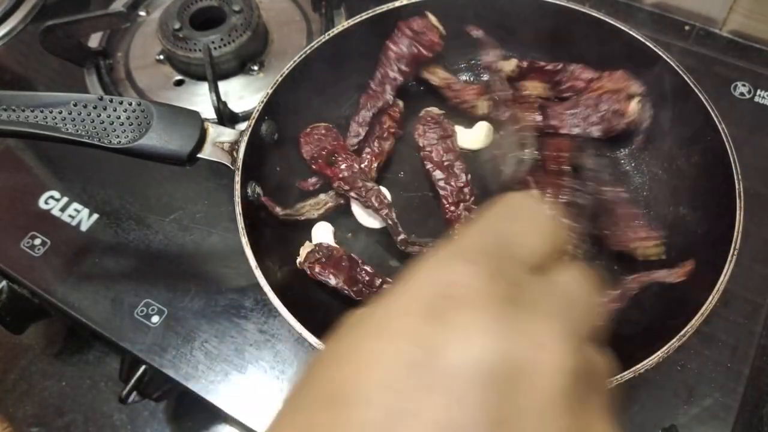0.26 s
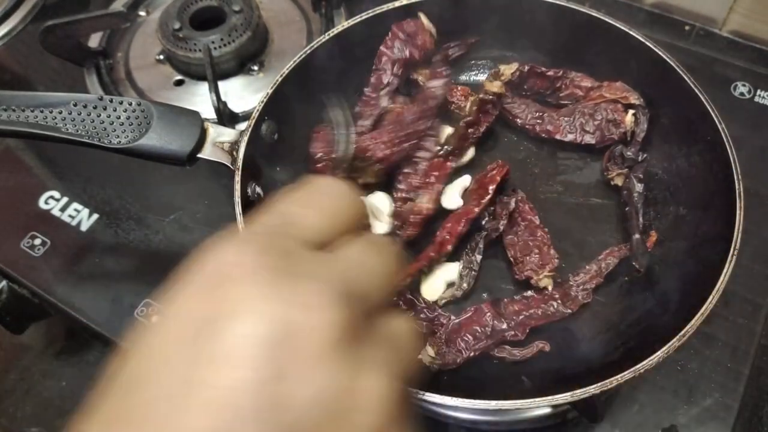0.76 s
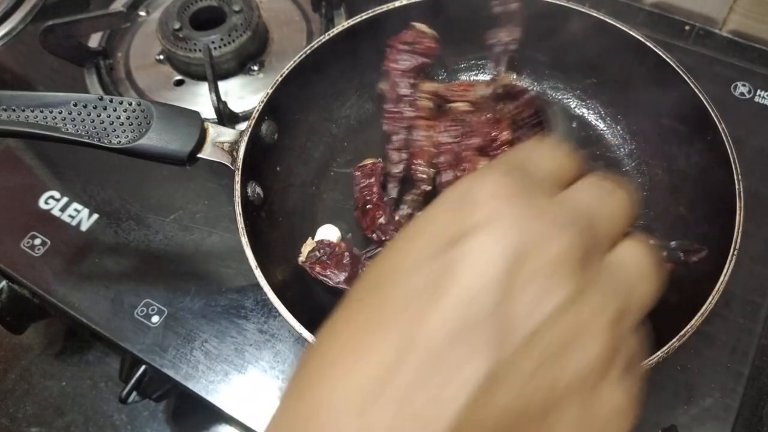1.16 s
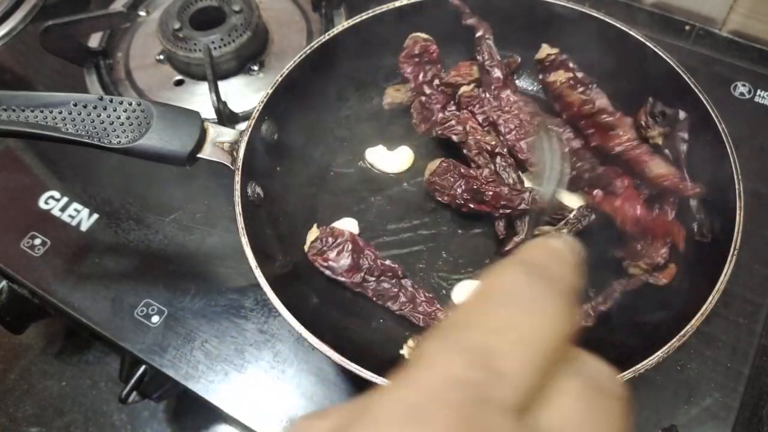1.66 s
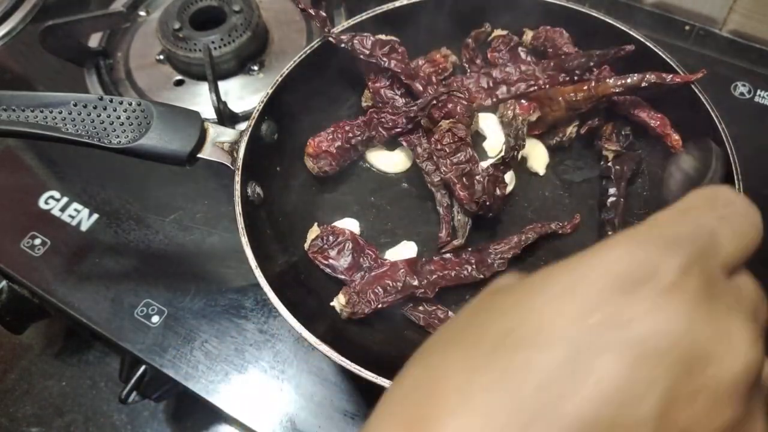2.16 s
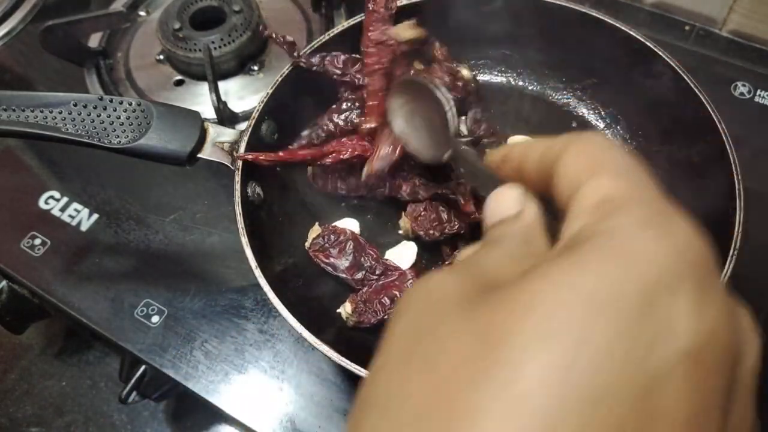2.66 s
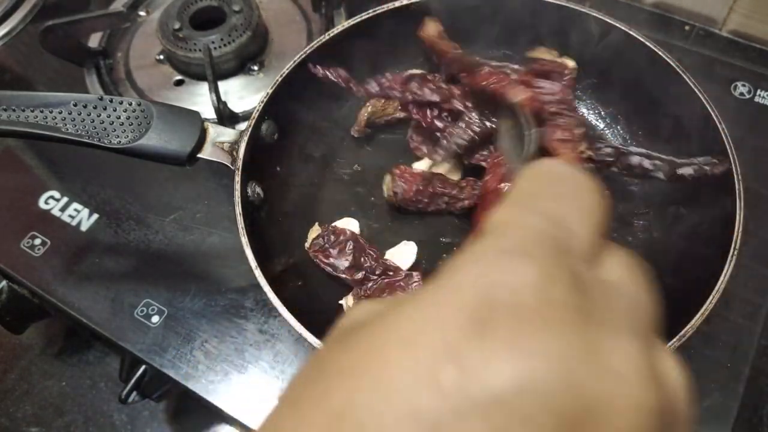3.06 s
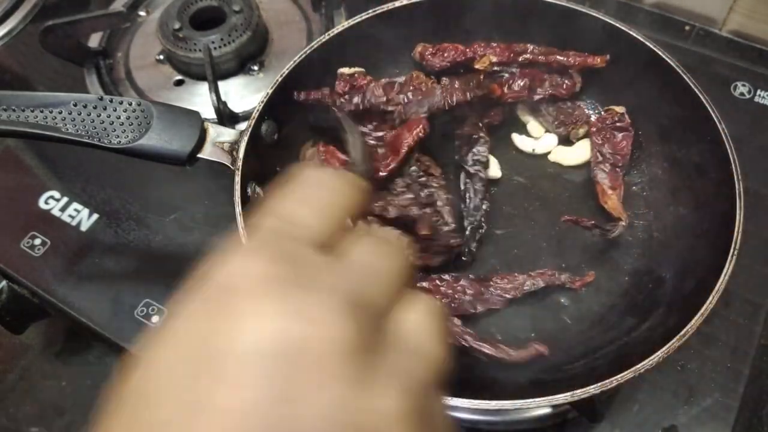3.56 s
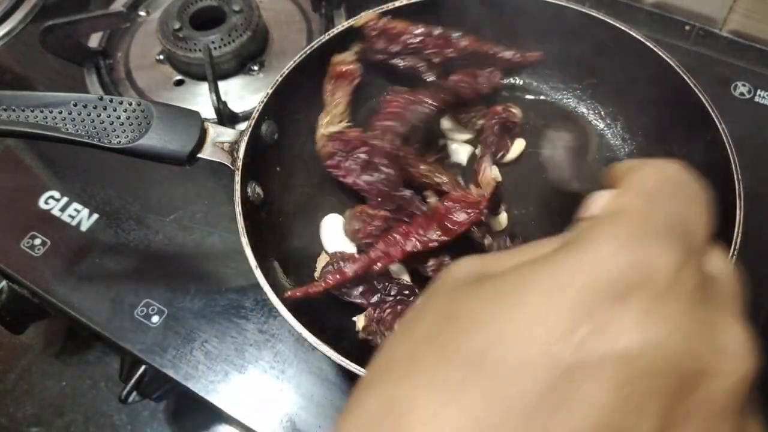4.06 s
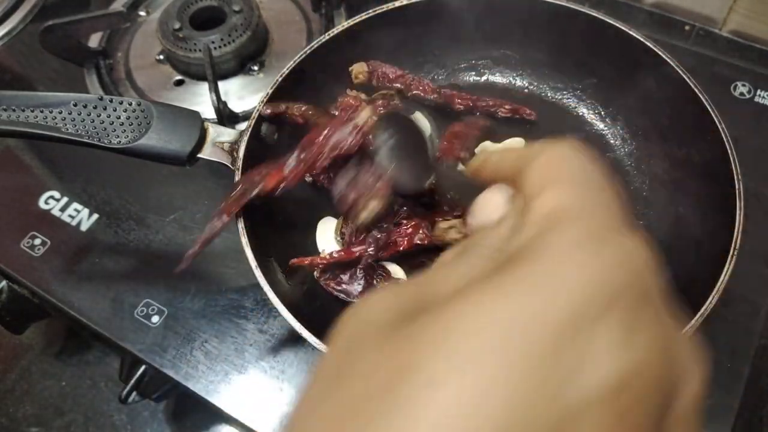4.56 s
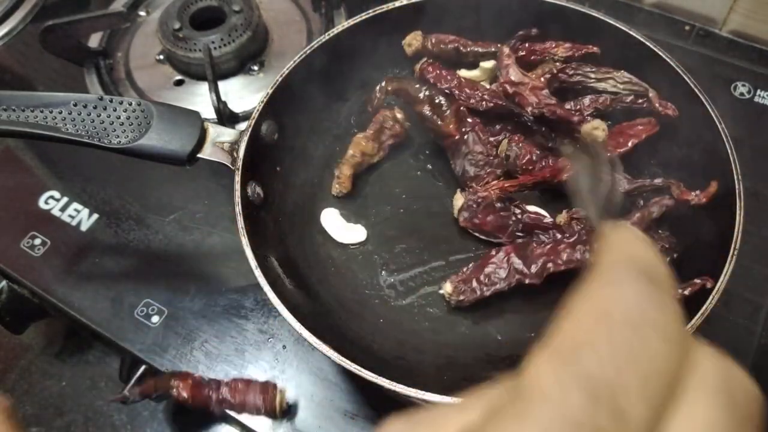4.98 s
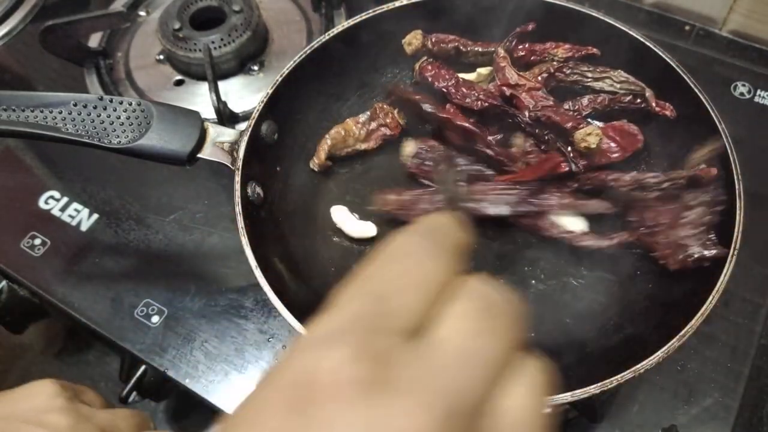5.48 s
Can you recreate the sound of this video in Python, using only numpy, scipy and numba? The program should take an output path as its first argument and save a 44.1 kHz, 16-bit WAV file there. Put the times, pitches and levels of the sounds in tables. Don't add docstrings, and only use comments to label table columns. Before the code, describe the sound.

Heard from just above the pan, stirring begins mid-action with a dense clatter of nuts and crackling pods. Spoon taps give short, food-muffled pan notes, and dragging makes gritty scrapes. A hard knock comes just after one second; later strokes are spaced, with a near pause midway and firmer knocks near four seconds. Fine seed patter trails off over quiet burner hiss and room hum in a small hard-walled kitchen.

```python
import sys
import numpy as np
from scipy import signal
from scipy.fft import rfft, irfft, next_fast_len
from scipy.io import wavfile
from scipy.ndimage import uniform_filter1d
from numba import njit

SR = 44100
rng = np.random.default_rng(int(sys.argv[2]) if len(sys.argv) > 2 else 0)


def store_wav(level_fs):
    pcm = np.round(np.clip(np.atleast_2d(level_fs), -1, 1) * 32767)
    wavfile.write(sys.argv[1], SR, pcm.T.astype(np.int16))


def amplitude_ratio(level_db):
    exponent = np.asarray(level_db, float) / 20
    return 10 ** exponent


N = 252260

# (time [s], bell peak [dB], rim re bell [dB], base re bell [dB])
TAPS = [(0.219, -37, -13, -18.5), (0.2572, -37, 1.5, -4), (0.371, -25, 9, -33), (0.405, -33, 3.5, -32.5),
        (0.435, -24, 2.5, -50), (0.68, -33, -13.5, -44), (0.7877, -30, 7, -47), (0.1514, -36.5, 2, -24),
        (0.9406, -44, -31, -56), (1.1561, -23, -23, 0.5), (1.224, -51, -25, -24), (1.267, -35.5, -6, -8),
        (1.3978, -32, -12, -48), (1.4468, -36, -27, -38), (1.7866, -38, -3.5, -33), (2.188, -36.5, 7, 4.5),
        (2.221, -44.5, -6, 14), (2.341, -33, -8, -34), (3.049, -32, -4.5, -50), (3.3256, -31.5, -29, -32),
        (3.4056, -32.5, -1, -49), (3.6036, -35.5, -2, -22), (3.921, -27.5, -24, -16.5),
        (3.984, -45, -19, -17), (4.125, -35, -6, -41), (4.2509, -25, -13.5, -6.5), (4.399, -28.5, 1.5, -14),
        (4.4902, -35, 12, -28), (4.6337, -36, 3, -40), (4.948, -33.5, -30, -8), (0.4977, -44, 3, -33),
        (0.548, -38.5, -9, -33), (0.618, -46, -7, -28), (0.764, -39.5, 2.5, -33), (0.831, -32, -7, -22),
        (0.897, -40, 11, -38.5), (1.2804, -32, 1.5, -33), (1.635, -46, 3, -40), (2.2516, -44, -16, 1),
        (2.288, -32, -16, -25), (2.996, -48, -6, -29), (3.3776, -38.5, -13, -35), (3.696, -38.5, 6, -33),
        (4.0552, -36, 0, -34), (4.343, -41, 8, 2), (4.375, -39, 10, -2.5), (4.8488, -37.5, -10, -36),
        (5.125, -49.5, 14, -38), (5.434, -38, -21, -35), (0.562, -28, 7, -35)]
# (time [s], peak [dB], skin pitch [Hz], hollow body re crack [dB])
TICKS = [(0.046, -17, 8050, -16), (0.16, -36, 7540, 5), (0.2403, -20.5, 7540, -26),
         (0.299, -15, 7990, -0.5), (0.3832, -18.5, 7990, 0.5), (0.464, -22, 7990, -16),
         (0.6521, -18, 6940, -9), (0.7658, -20.5, 7050, -2), (1.1565, -17, 5850, 0.5),
         (1.2592, -33, 7420, 2), (1.4132, -36, 7600, -13), (1.475, -20.5, 7600, -1),
         (1.7587, -27, 8260, -36), (1.803, -26.5, 7990, -23), (2.1821, -17.5, 4450, -2),
         (2.2657, -21, 8350, -22), (2.342, -23, 8800, -19), (2.577, -29.5, 8850, -33.5),
         (3.3125, -28, 5870, -2), (3.3844, -23.5, 7180, -8.5), (3.4927, -22, 7400, -12.5),
         (3.596, -31, 7300, -2), (3.919, -22, 7930, -9), (4.2517, -21, 8700, -28), (4.351, -24, 7560, -23),
         (4.898, -21, 8300, -20), (5.125, -25.5, 7000, -10), (5.217, -24.5, 8060, -11.5),
         (5.271, -33, 7400, -29), (5.4239, -20, 7250, -21), (0.1747, -24, 8300, -20),
         (1.3975, -33, 7190, -15), (2.035, -29, 8230, -6), (2.1283, -31, 9330, -28.5),
         (2.617, -33, 8630, -21), (2.9372, -52, 7600, -8), (3.009, -33, 8400, -29),
         (3.5498, -30, 9700, -21), (3.6102, -22, 7620, -15), (3.675, -43, 7400, -19),
         (3.9777, -25.5, 7400, -12), (4.3266, -29, 7500, -12), (4.375, -30, 9500, 1),
         (4.6478, -35.5, 7300, -14), (4.7306, -34, 7200, -7), (4.931, -21, 8560, -28),
         (5.3327, -32, 7220, -26), (5.445, -46, 7240, -21), (5.5583, -36, 7640, -14),
         (0.8355, -27, 7200, 5)]
# (frequency [Hz], density [dB per Hz])
POD = [(400, -24), (700, 0), (1300, 1), (2300, 6.5), (3300, 2.5), (4500, -4.5), (6000, -60)]
# (frequency [Hz], density [dB per Hz])
AIR = [(8500, -20.5), (10300, 1.5), (12500, 1.5), (14500, -3.5), (15300, -9.5), (16200, -29)]
LEFT_LAG = dict(base=.7, bell=.6, rim=1.5, spoon=1.5)
LOADED_T60_S = 0.098
SNAP_T60_S = 0.003


def colour(x, points):
    size = next_fast_len(N + 4096)
    hz, db = np.transpose(points)
    bins_hz = np.arange(size // 2 + 1) * SR / size
    gain = amplitude_ratio(np.interp(np.log(bins_hz + 1), np.log(hz), db))
    gain = gain / np.sqrt(np.mean(gain ** 2))
    return irfft(rfft(x, size) * gain, size)[..., :N]


def band(x, lo_hz, hi_hz):
    return signal.sosfilt(signal.butter(2, [lo_hz, hi_hz], "band", fs=SR, output="sos"), x)


def smear(x, t60_s):
    decay = 1000. ** (-np.arange(16384) / SR / max(t60_s, .001))
    tail = rng.standard_normal((2, 16384)) * decay
    tail = tail / np.sqrt(np.sum(tail ** 2, 1, keepdims=True))
    return signal.fftconvolve(np.atleast_2d(x), tail, axes=1)[:, :N]


def sides(pan_db):
    return amplitude_ratio(np.array([pan_db, -pan_db]).reshape(2, -1) / 2)


def grit(rate, spread_db):
    on = rng.random(N) < rate / SR
    size = amplitude_ratio(spread_db * np.minimum(rng.exponential(size=N), 4))
    x = on * rng.choice([-1., 1.], N) * size
    return x / np.sqrt(np.mean(x ** 2))


def walk(rate):
    hold = int(SR / rate)
    steps = np.repeat(rng.standard_normal(1024)[:N // hold + 1], hold)[:N]
    return 1.6 * uniform_filter1d(steps, hold)


def strokes(rows):
    swell_db_per_s, fade_db, fade_bend = 55, 35.5, 1.3
    bite_s, lead_s = .014, .006
    columns = np.transpose(rows)[:, :, None]
    (s, swell, fade, db), trait = columns[:4], columns[-1]
    t = np.arange(0, N, 32) / SR
    late = t - s - swell
    rise = swell_db_per_s * np.minimum(late, 0)
    fall = fade_db * (np.maximum(late, 0) / abs(fade)) ** fade_bend
    bite = np.clip((t - s + lead_s) / bite_s, 0, 1)
    power = (amplitude_ratio(db + rise - fall) * bite) ** 2 + 1e-12
    total = power.sum(0)
    curves = 10 * np.log10(total), (power * trait).sum(0) / total
    return [np.interp(np.arange(N) / SR, t, curve) for curve in curves]


@njit
def resonate(force, drift, soft, fade, spin):
    out, push, z = np.empty(len(force), np.complex128), 0j, 0j
    for i in range(len(force)):
        push = soft * spin * push + (1 - soft) * force[i]
        z = fade * spin * complex(1 - drift[i] ** 2 / 2, drift[i]) * z + push
        out[i] = z
    return out


def ring(modes, s, hit, drag, lag, most_s, push_s=0.0033, detune=.012):
    uneven_db = 2.5
    turns = np.zeros(N, complex)
    soft = np.exp(-1 / (push_s * SR))
    for hz, db, t60 in modes:
        fade = np.exp(-np.log(1000) / (min(t60, most_s) * SR))
        strength, phase = rng.standard_normal((2, len(s)))
        force = drag * np.sqrt(2 - 2 * fade ** 2) + 1e-18j
        force[(s * SR).astype(int)] += hit * amplitude_ratio(uneven_db * strength) * np.exp(.5j * phase)
        drift = 2 * np.pi * detune * hz / SR * walk(30)
        turns += amplitude_ratio(db) * resonate(force, drift, soft, fade, np.exp(2j * np.pi * hz / SR))
    left_right = np.array([[-1], [1]])
    out = np.cos(lag / 2) * turns.imag + np.sin(lag / 2) * turns.real * left_right
    return band(out, 0.54 * modes[0][0], 1.5 * modes[-1][0])


def kitchen(alike=.88):
    # (frequency [Hz], density [dB per Hz])
    air_points = [(20, -33), (60, 7.5), (150, 7.5), (400, 11), (700, 1), (1050, 9), (2000, -6.5),
                  (5000, -7), (8000, -13), (10500, -30.5), (16000, -55.5)]
    # (time [s], pitch [Hz], level [dB], half length [s])
    nudges = [(1.99, 99, -65, .045), (1.98, 70, -72, .04), (2.0, 130, -73, .04), (.22, 300, -62, .025),
              (1.85, 150, -72, .03), (2.23, 150, -70, .03), (1.3, 200, -72, .05), (.88, 100, -76, .04),
              (1.53, 400, -69, .03), (2.77, 340, -73, .03), (3.228, 330, -71, .02), (3.63, 330, -67, .025),
              (5.245, 330, -70, .02), (5.295, 330, -70, .02)]
    t = np.arange(N) / SR
    shared, left, right = rng.standard_normal((3, N))
    noise = np.sqrt(alike) * shared + np.sqrt(1 - alike) * np.array([left, right])
    out = amplitude_ratio(-82.5) * colour(noise, air_points)
    for s, hz, db, half_s in nudges:
        out = out + amplitude_ratio(db) * np.exp(-((t - s) / half_s) ** 2) * np.sin(2 * np.pi * hz * t)
    return out


def burner():
    # (centre [Hz], width [Hz], level [dB])
    hiss_bands = [(113.4, 44, -87), (7400, 160, -87.5), (8700, 110, -64.5), (9500, 110, -74.5),
                  (9490, 200, -62), (9510, 130, -67.5)]
    out = 0
    for hz, width_hz, db in hiss_bands:
        mics = 2 if hz > 500 else 1
        jet = band(rng.standard_normal((mics, N)), hz - width_hz / 2, hz + width_hz / 2)
        out = out + amplitude_ratio(db) * jet / np.std(jet)
    return out


def rubs(rate, spread_db, tail_s):
    keep = np.exp(-1 / (tail_s * SR))
    return np.sqrt(signal.lfilter([1 - keep], [1, -keep], grit(rate, spread_db) ** 2))


def patchy(x, patchy_db, size=(5, 9)):
    z = signal.stft(x, nperseg=512)[2]
    field = uniform_filter1d(rng.standard_normal(z.shape[1:]), size=size[0], axis=0)
    field = uniform_filter1d(field, size=size[1], axis=1)
    gain = amplitude_ratio(patchy_db * field / field.std())
    gain = gain / np.sqrt(np.mean(gain ** 2))
    return signal.istft(z * gain, nperseg=512)[1][:, :N]


def rustle(skin_db, body_db, air_db):
    # (frequency [Hz], density [dB per Hz])
    skin_points = [(2500, -37.5), (3500, -8), (4500, -8), (6300, -9.5), (7300, -1), (8400, -5.5),
                   (9100, -7.5), (9700, -10), (10500, -13.5), (12000, -51)]
    crackle = rubs(2200, 2.6, 0.003) * amplitude_ratio(skin_db + 1.78 * walk(25))
    hollow = rubs(770, 5.0, 0.017) * amplitude_ratio(skin_db)
    noise = rng.standard_normal((3, 2, N))
    skin = colour(crackle * noise[0], skin_points)
    body = colour(np.sqrt(crackle * hollow) * amplitude_ratio(body_db) * noise[1], POD)
    air = colour(crackle * amplitude_ratio(air_db) * noise[2], AIR)
    mix = amplitude_ratio(3.5) * skin * sides(-0.38) + amplitude_ratio(2.5) * body * sides(2.4) + amplitude_ratio(2.0) * air * sides(7.1)
    return patchy(mix, patchy_db=2.5)


def snaps(rustle_db):
    # (time [s], peak [dB])
    breaks = [(0.6514, -32), (1.414, -30), (1.4748, -22), (1.159, -39), (1.7613, -39), (1.8028, -37),
              (2.3486, -37), (1.717, -40), (1.7401, -41), (1.8262, -40), (1.859, -43), (2.185, -33),
              (2.226, -34), (2.243, -32), (2.2672, -29), (2.305, -38), (2.3424, -31), (2.3997, -43),
              (2.451, -42), (2.4968, -43), (0.2592, -25), (0.965, -32), (3.311, -39.5), (3.682, -36),
              (4.409, -36), (4.4278, -43), (4.797, -53), (5.219, -30), (5.433, -41), (2.684, -50.5),
              (3.492, -25), (4.0434, -35), (4.1774, -52), (4.2507, -29), (4.8968, -24.5), (5.042, -40.5),
              (5.2699, -43)]
    # (frequency [Hz], density [dB per Hz])
    click_points = [(800, -29), (3000, -12), (7000, -1), (11000, -7), (16500, -10)]
    clicks = grit(250, 2.7) * amplitude_ratio(rustle_db - 14)
    s, db = np.transpose(breaks)
    clicks[(s * SR).astype(int)] += amplitude_ratio(db + 11)
    return colour(smear(clicks, SNAP_T60_S), click_points) * sides(4.9)


def pan(bell_db, rim_db, base_db, rustle_db):
    # (frequency [Hz], level [dB], t60 [s])
    bell_modes = [(965, -20, 0.09), (993.4, -15.5, 0.1), (1020, -21, 0.065), (1053, -12, 0.1),
                  (1065, -3, 0.1)]
    rim_modes = [(1830, -11, 0.045), (1858, -8, 0.055), (2018, -23, 0.06), (2190, -26, 0.06),
                 (2520, -30, 0.05)]
    base_modes = [(285, -11, 0.027), (329, -7.5, 0.2), (363, -9.5, 0.08), (431, -16, 0.079),
                  (508, -14.5, 0.12), (668.4, -4, 0.052)]
    spoon_modes = [(5940, -15, 0.1), (6700, -3.5, 0.065), (7480, -8, 0.08), (7990, -3, 0.12),
                   (8880, -3, 0.1), (9400, -11, 0.1)]
    s, db, tap_rim_db, tap_base_db = np.transpose(TAPS)
    slip = grit(900, 3.64) * amplitude_ratio(bell_db)
    bell = ring(bell_modes, s, amplitude_ratio(db - 2.0), slip * amplitude_ratio(-1.5), LEFT_LAG["bell"], LOADED_T60_S)
    rim = ring(rim_modes, s, amplitude_ratio(db + tap_rim_db + 0.5), slip * amplitude_ratio(rim_db + 5.5),
               LEFT_LAG["rim"], LOADED_T60_S, push_s=0.0016, detune=0.01202)
    base = ring(base_modes, s, amplitude_ratio(db + tap_base_db - 11.0), slip * amplitude_ratio(base_db + 5.0),
                LEFT_LAG["base"], 2 * LOADED_T60_S)
    tick_s, tick_db = np.transpose(TICKS)[:2]
    rub = grit(420, 9.5) * amplitude_ratio(rustle_db - 9.0)
    spoon = ring(spoon_modes, tick_s, amplitude_ratio(tick_db - 22.0), rub, LEFT_LAG["spoon"], LOADED_T60_S,
                 push_s=0.00049)
    return bell * sides(-2.0) + rim * sides(4.1) + base * sides(2.5) + spoon


def seeds():
    # (start [s], swell [s], fade [s], level [dB])
    trickles = [
        (1.626, 0.16, 0.48, -52),
        (2.2, 0.11, 0.26, -51.5),
        (2.4, 0.061, 0.32, -53.5),
        (2, 0.034, 0.2, -56),
        (0.032, 0.07, 0.13, -48.5),
        (0.25, 0.13, 0.17, -45),
        (3.5, 0.055, .25, -62),
        (3.93, 0.074, .3, -59.5),
        (4.3, 0.045, 0.2, -53.5),
    ]
    patter = np.array([grit(3000, 2.5), grit(3000, 2.5)])
    return colour(smear(patter * amplitude_ratio(strokes(trickles)[0]), SNAP_T60_S), AIR) * sides(8.5)


def ticks(crack_s=.0028, skin_s=.004, body_s=.006, rise_s=.0006):
    # (frequency [Hz], density [dB per Hz])
    crack_points = [(1500, -40), (2500, -22), (4500, -8), (7300, 8), (9500, -2), (13000, -6), (15500, -20),
                    (16500, -55)]
    crack, body, skin = np.zeros((3, 2, N + 2048))
    t = np.arange(2048) / SR
    for s, db, hz, body_db in TICKS:
        noise = rng.standard_normal((2, 2, 2048))
        at = slice(int(s * SR), int(s * SR) + 2048)
        gain = amplitude_ratio(db) * (1 - np.exp(-t / rise_s))
        crack[:, at] += gain * noise[0] * np.exp(-t / crack_s)
        body[:, at] += gain * amplitude_ratio(body_db) * noise[1] * np.exp(-t / body_s)
        phase = 3 * noise[0, :, :1]
        skin[:, at] += gain * np.sin(2 * np.pi * hz * t + phase) * np.exp(-t / skin_s)
    cracks = amplitude_ratio(-16.5) * colour(crack[:, :N], crack_points) * sides(6)
    bodies = amplitude_ratio(-14.5) * colour(body[:, :N], POD)
    return cracks + bodies + amplitude_ratio(-8) * skin[:, :N]


def dish():
    # (frequency [Hz], level [dB], t60 [s])
    floor_modes = [(680, -18, .07), (870, -18.5, 0.031), (941, -10, .05), (972, -6, .07), (997, -8.5, .07),
                   (1028, -13.5, 0.09), (1396, -14, 0.02), (1606, -7, 0.043)]
    # (time [s], peak [dB])
    landings = [(1.1565, -23), (1.228, -37), (1.266, -36), (1.475, -42), (2.185, -34.5), (2.199, -39.5),
                (2.265, -37), (2.277, -36), (2.29, -36), (2.306, -40), (2.321, -35), (2.36, -42),
                (3.596, -50), (3.919, -30.5), (3.957, -37), (3.972, -41), (4.005, -39), (4.2505, -32.5),
                (4.343, -42), (4.948, -41), (5.218, -53), (0.046, -42), (0.259, -39), (0.3, -44)]
    s, db = np.transpose(landings)
    return ring(floor_modes, s, amplitude_ratio(db), np.zeros(N), 1.0, LOADED_T60_S, push_s=0.00097) * sides(-1.5)


def raps(ring_s=0.011, width_hz=700):
    # (time [s], peak [dB], pitch [Hz])
    nuts = [(0.048, -5, 2400), (0.0947, -8.5, 2520), (0.158, -11, 2320), (0.3009, -9, 2290),
            (0.3725, -11, 2630), (0.4311, -9.5, 2680), (0.4612, -12.5, 2300), (0.764, -14.5, 2720),
            (1.1565, -9.5, 4510), (1.28, -20, 2930), (1.3147, -24, 2900), (1.475, -12, 1980),
            (2.184, -30, 4550), (1.1575, -20.5, 880), (2.682, -20, 3100), (3.594, -19, 2160),
            (4.9497, -16, 2300), (5.4247, -22, 3040), (0.356, -13, 2320), (2.578, -36, 1430),
            (2.74, -33, 2320), (2.936, -38, 770), (5.218, -39, 1520), (5.58, -33, 2350), (0.436, -19, 2280),
            (4.048, -28, 2300)]
    out, t = np.zeros((2, N + 2048)), np.arange(2048) / SR
    for s, db, hz in nuts:
        burst = rng.standard_normal((2, 2048)) * np.exp(-t / ring_s)
        note = band(burst, hz - width_hz / 2, hz + width_hz / 2)
        out[:, int(s * SR):int(s * SR) + 2048] += amplitude_ratio(db - 21.0) * note / abs(note).max()
    return out[:, :N]


def thuds(jolt_s=.02):
    s, db, _, base_db = np.transpose(TAPS)
    blows = np.zeros(N)
    blows[(s * SR).astype(int)] = amplitude_ratio(db + base_db - 2.5)
    jolt = signal.lfilter([1], [1, -np.exp(-1 / (jolt_s * SR))], blows)
    return band(jolt * grit(2500, 2.5), 400, 1440) * sides(2.3)


def wall():
    # (frequency [Hz], level [dB], t60 [s])
    wall_modes = [(2250, -12, .05), (2835, -1.5, 0.077)]
    # (time [s], peak [dB])
    clinks = [
        (.372, -31),
        (.436, -35),
        (1.172, -40),
        (1.208, -45),
        (1.279, -37),
        (1.3147, -35),
        (1.365, -46),
    ]
    s, db = np.transpose(clinks)
    return ring(wall_modes, s, amplitude_ratio(db), np.zeros(N), LEFT_LAG["rim"], LOADED_T60_S, push_s=0.0011, detune=.004)


def squeal():
    # (frequency [Hz], level [dB], t60 [s])
    edge_modes = [(4240, -6.5, .03), (5900, -6, .03), (7550, 0.5, .03), (8700, -13, .04), (9810, -4, .03)]
    # (start [s], swell [s], fade [s], level [dB])
    squeals = [
        (2.9, .01, 0.055, -51),
        (4.3, 0.095, .06, -47.5),
        (4.365, 0.033, 0.05, -44),
        (.38, 0.018, 0.14, -48.5),
        (3.61, 0.024, .1, -58),
    ]
    drag = grit(1600, 3.5) * amplitude_ratio(strokes(squeals)[0])
    return ring(edge_modes, np.zeros(1), 0, drag, LEFT_LAG["spoon"], LOADED_T60_S, push_s=0.00054, detune=0.006)


def scene():
    # (start [s], swell [s], fade [s], rustle [dB], pod body re rustle [dB])
    heap_strokes = [(-.03, 0.041, 0.19, -45, 0), (.165, 0.093, 0.53, -46.5, 0.5),
                    (.37, 0.091, 1, -47.5, 0.5), (.56, 0.22, 0.18, -50, -28),
                    (.764, 0.074, 0.34, -44, -10.5), (1.12, 0.024, 0.16, -52, -3),
                    (1.155, 0.098, 0.34, -45, -5), (1.396, 0.027, 0.12, -53.5, -7),
                    (1.472, 0.041, 0.58, -46.5, -4), (1.8, 0.19, 0.3, -45.5, -7),
                    (2.183, 0.09, 0.35, -45.5, -5), (2.578, 0.058, 0.38, -60.5, -11.5),
                    (2.64, 0.047, 0.21, -52.5, -9), (2.93, 0.13, 0.37, -49.5, -8.5),
                    (3.305, 0.11, 0.16, -44.5, -8.5), (3.49, 0.11, 0.63, -59, -11),
                    (3.593, 0.093, 0.32, -46.5, -4.5), (3.915, 0.14, 0.43, -49.5, -3.5),
                    (4.25, 0.0076, 0.11, -52.5, -5.5), (4.345, 0.044, 0.45, -48, -3),
                    (4.63, 0.013, 0.89, -66, -11), (4.72, 0.21, 0.24, -45, -6),
                    (5.124, 0.11, 0.36, -51, -8.5), (5.422, 0.0087, 0.33, -45, -10),
                    (5.47, 0.065, 0.22, -50, -4), (.045, 0.0053, 0.23, -45, 2),
                    (.299, 0.0037, 0.031, -65, 6), (2.34, 0.0043, 0.049, -59, -31),
                    (4.375, 0.015, 0.044, -49, -5), (5.215, 0.008, 0.055, -50, -5),
                    (5.27, 0.0078, 0.073, -44.5, -10), (5.555, 0.026, 0.17, -55.5, -4),
                    (.652, 0.0032, 0.048, -50.5, -9)]
    # (start [s], swell [s], fade [s], bell [dB], place [0 centre - 1 rim])
    scrapes = [(-.03, 0.025, 0.44, -53.5, 0.23), (.15, 0.086, 0.36, -45, 0.42),
               (.37, 0.048, 0.044, -42.5, 0.87), (.46, 0.13, 0.037, -36.5, 0.64),
               (.62, 0.075, 0.23, -48.5, 0.78), (.765, 0.1, 0.23, -55.5, 0.87),
               (1.15, 0.0083, 0.28, -41, 0.26), (1.396, 0.055, 0.19, -50, 0.61),
               (1.48, 0.1, 0.25, -49, 0.74), (1.79, .01, 0.15, -53.5, 0.51), (1.86, 0.14, 0.1, -49.5, 0.37),
               (2.183, 0.082, 0.25, -43, 0.29), (2.6, 0.033, 0.078, -65.5, 0.43),
               (2.93, 0.004, 0.025, -51, 1), (2.98, 0.043, 0.43, -52, 0.62), (3.31, 0.034, 0.45, -52, 0.96),
               (3.597, 0.12, 0.23, -48, 0.61), (3.917, 0.0056, 0.2, -37, 0.26),
               (4.25, 0.017, 0.37, -43.5, 0.17), (4.33, 0.021, 0.47, -49, 0.57),
               (4.63, .01, 0.22, -71, 0.64), (4.72, 0.22, 0.22, -48, 0.37), (5.124, 0.11, 0.19, -50, 0.47),
               (5.422, 0.061, 0.16, -52, 0.76), (2.25, 0.1, 0.19, -51.5, 0.15),
               (5.6, 0.069, 0.091, -64.5, .3), (.94, .01, 0.096, -57.5, 0.53)]
    # (at the centre [dB], at the rim [dB])
    rim_ends_db = (-16, 0)
    base_ends_db = (-5, -50.5)
    rustle_db, pod_db = strokes(heap_strokes)
    bell_db, place = strokes(scrapes)
    rim_db, base_db = (a + (b - a) * place for a, b in (rim_ends_db, base_ends_db))
    quiet_db = (-48 - rustle_db).clip(-5, 20)
    body_db = pod_db - 0.29 * quiet_db
    air_db = -10.5 + 0.028 * quiet_db
    struck = pan(bell_db, rim_db, base_db, rustle_db) + ticks() + raps() + thuds()
    tiles = amplitude_ratio(-5.5) * smear(struck, t60_s=0.36)
    stirred = rustle(rustle_db, body_db, air_db) + snaps(rustle_db) + seeds()
    spoon_and_wall = dish() + squeal() + wall()
    return struck + tiles + stirred + spoon_and_wall + burner() + kitchen()


def top_cut(x):
    return signal.sosfilt(signal.butter(12, 16500, fs=SR, output="sos"), x)


def record(dry):
    # (frequency [Hz], left over right [dB])
    shadow = [(60, 4.5), (300, -8), (550, 5), (1100, 1), (2200, 1.6), (4000, 4), (6500, 10), (8500, 2),
              (12000, 1.2)]
    # (frequency [Hz], width [Hz], depth [0-1])
    port_notches = [(9100, 260, .75), (10400, 300, .6)]
    left, right = ([(hz, way * db / 2) for hz, db in shadow] for way in (1, -1))
    shaded = np.array([colour(dry[0], left), colour(dry[1], right)])
    for hz, width_hz, depth in port_notches:
        shaded = shaded - depth * signal.lfilter(*signal.iirpeak(hz, hz / width_hz, fs=SR), shaded)
    mix = signal.sosfilt(signal.ellip(6, .3, 60, 15700, fs=SR, output="sos"), shaded)
    return top_cut(mix)


dry = scene()
out = record(dry)
store_wav(out)
```